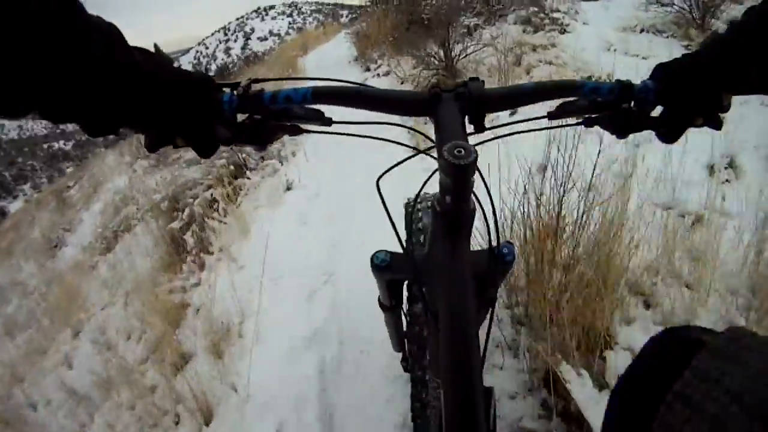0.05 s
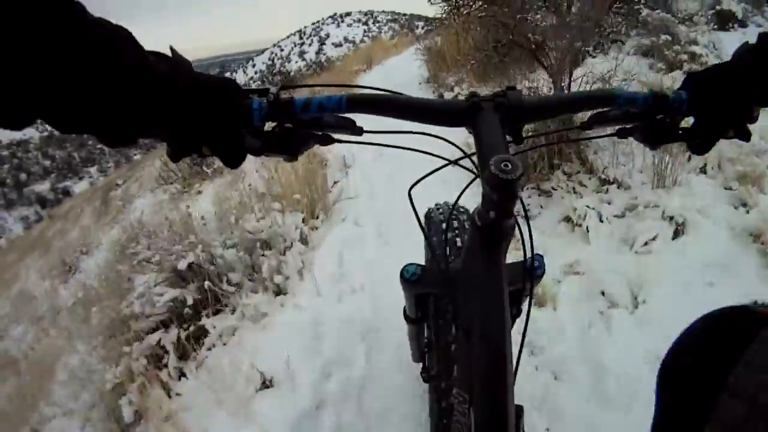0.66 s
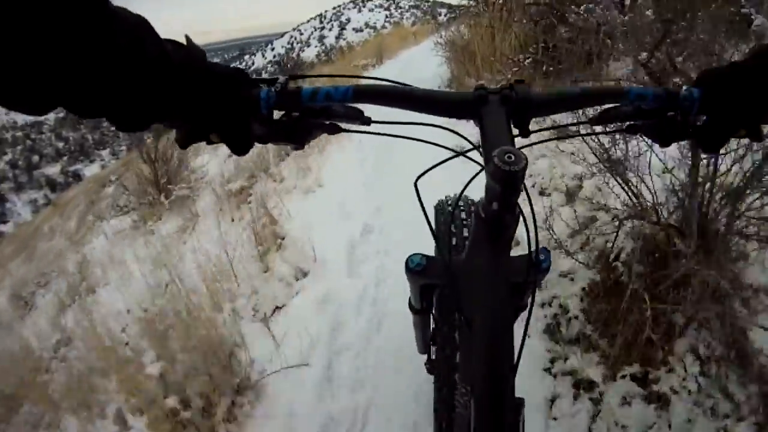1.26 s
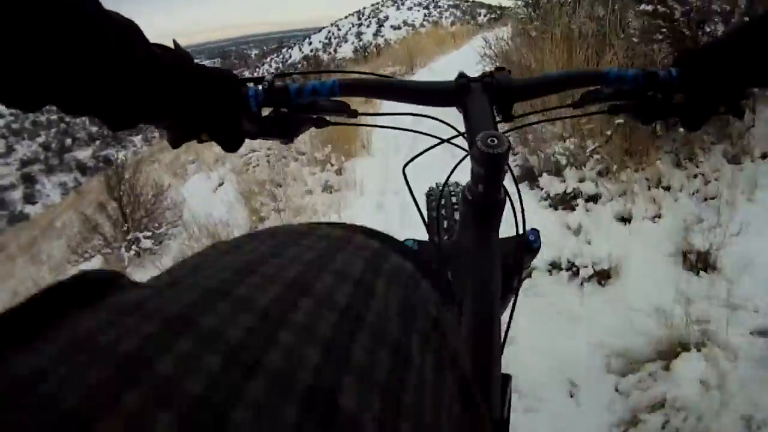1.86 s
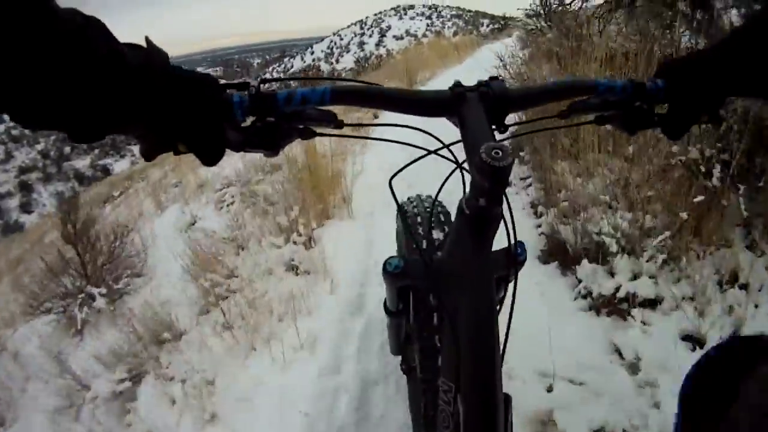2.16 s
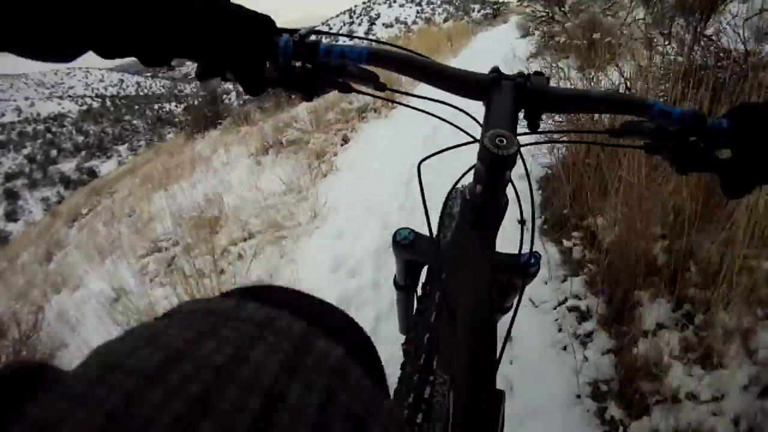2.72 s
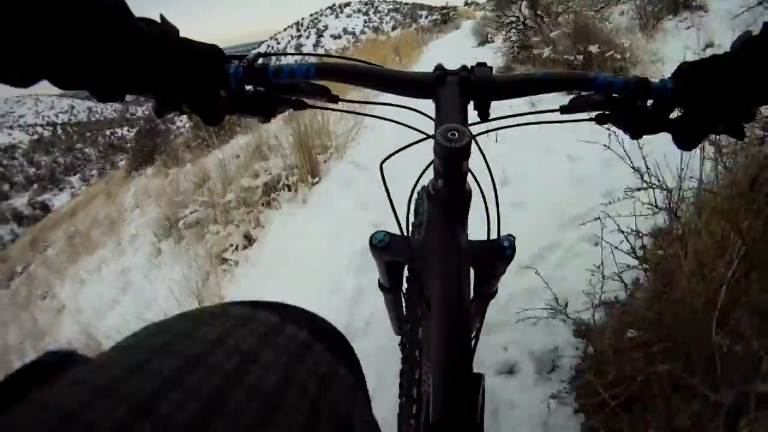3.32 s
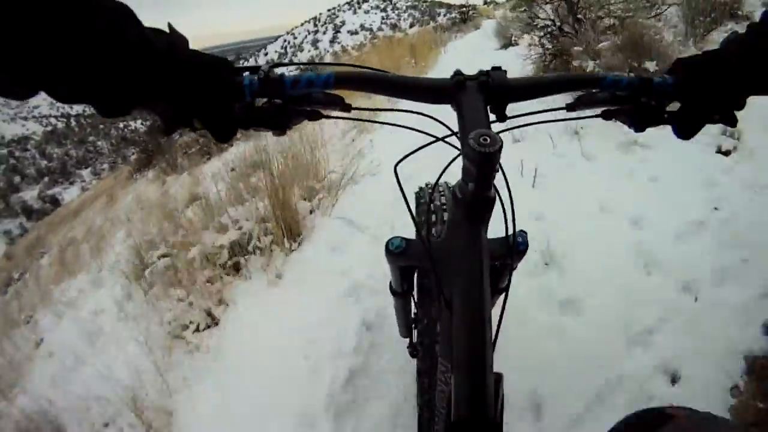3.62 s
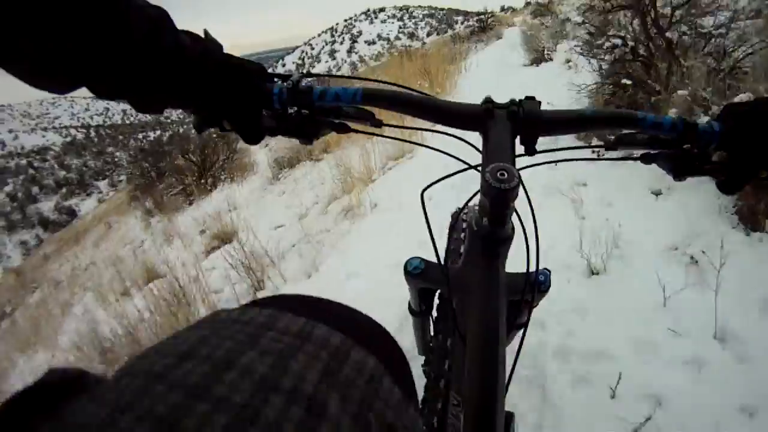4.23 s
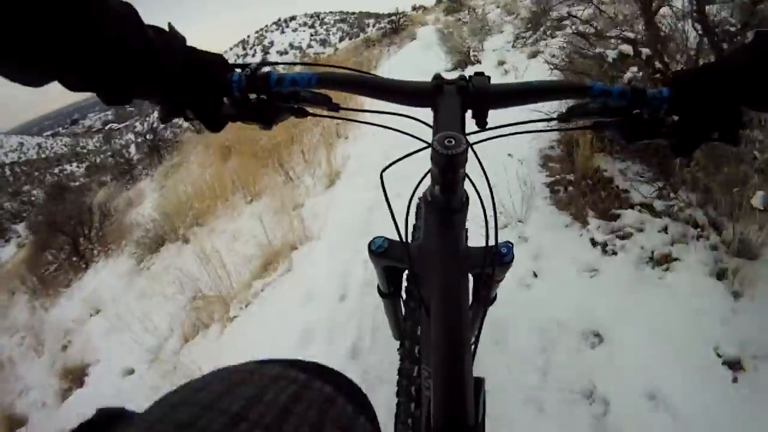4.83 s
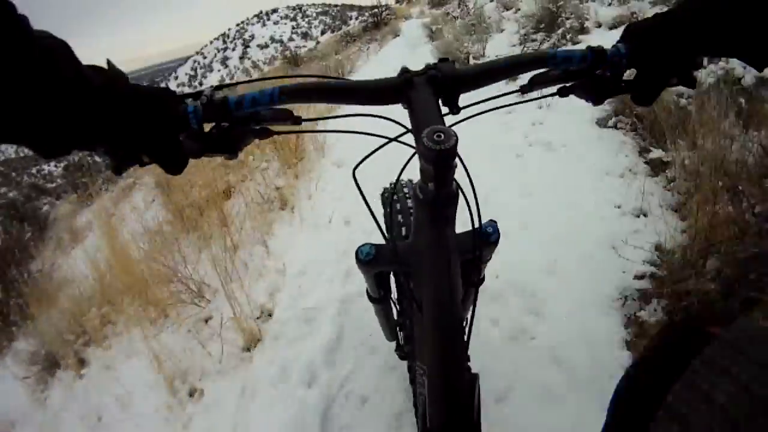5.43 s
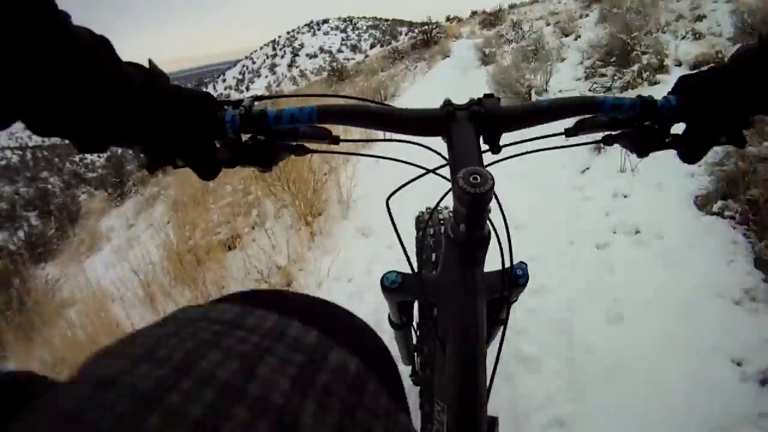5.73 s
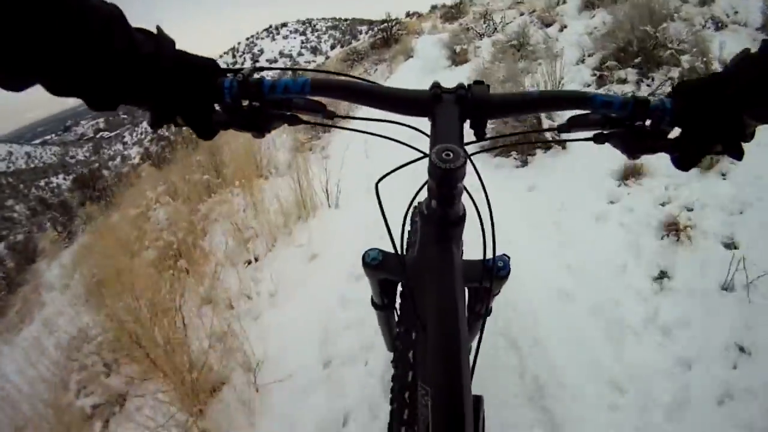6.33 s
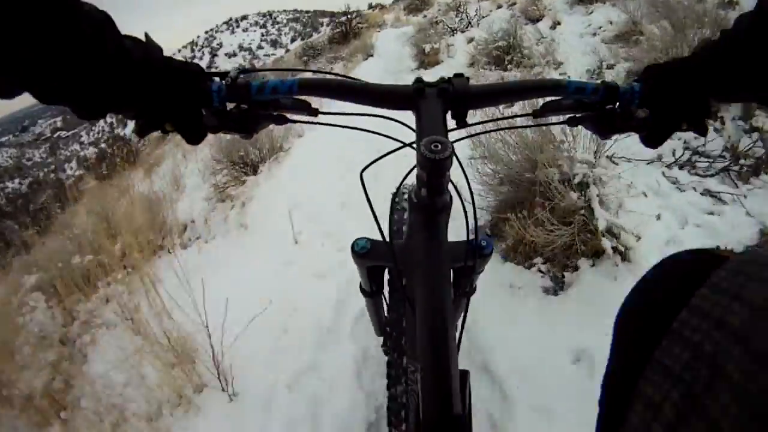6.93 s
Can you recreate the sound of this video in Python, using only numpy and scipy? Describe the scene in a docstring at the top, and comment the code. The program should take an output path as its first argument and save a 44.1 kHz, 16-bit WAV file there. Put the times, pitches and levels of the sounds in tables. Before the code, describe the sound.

A mountain bike rides along a snowy trail, its knobbly tyres making a steady low drone over a soft crunch of snow. Dull thumps shake the bike two or three times a second, often in quick pairs, and loose parts rattle faintly. The microphone on the rider's chest picks up deep air buffeting and body jolts. Everything sounds muffled and bass-heavy, with a slightly gritty, ringing edge.

```python
"""Tyres drone and crunch along a snowy trail, and a mountain bike knocks about twice to a pedal stroke.
The knocks are low thumps that shake the frame, and loose parts rattle along the way.
It is all heard from a closed camera on the rider's chest, jolted by the heaves of the rider's body.
The camera keeps only the bass and holds each value for a moment, which adds a gritty, ringing edge."""
import sys
import numpy as np
from scipy import signal
from scipy.fft import rfft, irfft, next_fast_len
from scipy.io import wavfile
from scipy.ndimage import map_coordinates

SR = 44100
rng = np.random.default_rng(int(sys.argv[2]) if len(sys.argv) > 2 else 0)


def transcribe(u):
    """Save the signal u as a 16-bit wav file named by the first command-line argument.

    u: samples, shape (n,) or (channels, n), limited to [-1, 1]; the rate is SR.
    q: integer samples, one column per channel.
    """
    v = np.clip(np.atleast_2d(u).T, -1, 1)
    q = np.round(v * 32767).astype(np.int16)
    wavfile.write(sys.argv[1], SR, q)


N = 316270
TIME = np.arange(N) / SR

# The bike's knocks, mostly a pair to each pedal stroke. Each row: start in seconds,
# relative thump level in dB, swell time in seconds, relative level of the frame's clack in dB.
BIKE_KNOCKS = [(0.5865, -30, 0.0088, -43.5), (0.9615, -28, 0.0041, -49.5), (1.031, -34, 0.0059, -51),
               (1.3561, -33, 0.0044, -45), (1.4196, -26, 0.0064, -56), (1.5083, -35, 0.0032, -50.5),
               (1.7098, -23.5, 0.0046, -41.5), (1.77, -29, .0043, -43.5), (2.082, -26.5, 0.0077, -42.5),
               (2.1421, -25, 0.0082, -47.5), (2.4578, -26.5, 0.0062, -43.5), (2.5107, -24.5, .008, -53),
               (2.9059, -30.5, 0.0089, -55), (3.2396, -31, 0.00444, -48.5), (3.5939, -31.5, 0.0056, -46.5),
               (4.1076, -29, 0.0077, -43), (4.4622, -32, 0.0062, -62), (4.4902, -30.5, 0.0066, -47.5),
               (4.8096, -25.5, 0.0039, -39), (4.8663, -26, 0.0063, -46.5), (5.1757, -32.5, 0.012, -52.5),
               (5.2178, -40, 0.002, -44), (5.64, -35, 0.0075, -60), (5.9189, -28, 0.0081, -49.5),
               (5.982, -26.5, 0.0075, -42.5), (6.732, -27, 0.0067, -50), (6.7707, -34, 0.0019, -44.5),
               (7.0923, -21, 0.0051, -39)]
# The tone of crunching snow, also used for rattles. Each row: frequency in Hz, relative level in dB.
CRUNCH_SPECTRUM = [(60, -3.5), (130, 0.5), (200, -3.5), (290, 0.5), (380, -2), (480, -2.5), (600, -3),
                   (740, -10), (1000, -39)]


def knocks(gain_db, thump_hz=76.7, hard_s=0.0051, stiffening=2.655, relax_s=0.0037):
    """Each knock is a dying thump whose pitch falls as the hard first contact relaxes."""
    track, t = np.zeros(N), TIME[:SR // 10]
    for start, db, swell_s, _ in BIKE_KNOCKS:
        hz = thump_hz * max(1, hard_s / swell_s) ** 0.32  # shorter contacts ring higher
        cycles = hz * (t + stiffening * relax_s * (1 - np.exp(-t / relax_s)))
        envelope = (t / swell_s * np.exp(1 - t / swell_s)) ** 1.64
        add(track, start, amp(db + gain_db) * envelope * np.sin(2 * np.pi * cycles))
    return track


def jolts(gain_db, swing_hz=24.1):
    """The camera is shoved and swings back; the pressure follows its acceleration."""
    # Heaves of the rider's body; the last row, at 7.16 s, is the push of a final knock. Each row: time of the
    # peak in seconds, relative level in dB.
    heaves = [(0.331, -26), (0.971, -36), (1.527, -32), (1.737, -26), (2.68, -29.5), (2.839, -28),
              (2.907, -32.5), (3.185, -30.5), (3.757, -37.5), (3.93, -27.5), (4.294, -29.5), (4.655, -32.5),
              (5.393, -31), (5.735, -31.5), (6.095, -27.5), (6.441, -29), (7.16, -28)]
    track = np.zeros(N)
    for peak_s, db in heaves:
        near = np.abs(TIME - peak_s) < 2 / swing_hz
        offset_squared = (np.pi * swing_hz * (TIME[near] - peak_s)) ** 2
        track[near] += amp(db + gain_db) * (1 - 2 * offset_squared) * np.exp(-offset_squared)
    return track


def rumble(level_db, sway_db, drone_db, throb_db):
    """The rider sways in the airflow while the knobbly tyres drone through the frame."""
    # The tones of the sway and of the drone. Each row: frequency in Hz, relative level in dB.
    sway_spectrum = [(2, -28), (7, 1), (14, 4.5), (25, -3.5), (40, -10), (55, -21.5), (90, -57), (200, -73)]
    drone_spectrum = [(25, -11), (50, -7.5), (64, -5.5), (80, -2.5), (100, -3.5), (125, -13.5),
                      (160, -19.5), (220, -24), (500, -87)]
    sway = amp(sway_db) * noise(sway_spectrum)
    drone = amp(drone_db) * unit(noise(drone_spectrum) * amp(throb_db * wobble(28)))
    return amp(level_db) * (sway + drone)


def frame_clacks(gain_db, ring_hz=309.7, lag_s=0.00042):
    """Every knock shakes the frame, which rings and scrapes an instant later."""
    # The tone of the frame's scrape. Each row: frequency in Hz, relative level in dB.
    grit_spectrum = [(60, -4), (140, 1.5), (220, 3.5), (320, -2), (450, -3), (600, -4.5), (740, -9.5),
                     (1000, -40)]
    shakes = [(start + lag_s, db + gain_db, ring_hz) for start, _, _, db in BIKE_KNOCKS]
    return clacks(shakes, grit_spectrum, ring_s=0.13, scrape_db=10.0, scrape_s=0.058, attack_s=0.00039)


def crunch(level_db, rustle_db, grain_db, grains_per_s, clump_db):
    """Snow packs under the tread: a fine rustle with clumps of small collapses."""
    collapses = (rng.random(N) < grains_per_s / SR) * rng.standard_normal(N)
    rustle = amp(rustle_db) * noise(CRUNCH_SPECTRUM)
    grains = amp(grain_db) * coloured(collapses, CRUNCH_SPECTRUM)
    clumps = unit(amp(clump_db * wobble(45)))
    return amp(level_db) * clumps * (rustle + grains)


def rattles(crunch_db, gain_db):
    """Loose parts tap and ring briefly: some clear taps, with faint chatter in between."""
    # The clearest taps. Each row: start in seconds, relative level in dB, pitch in Hz.
    clear_taps = [(0.2763, -48, 433), (0.3236, -46, 472), (0.3769, -44.5, 274), (0.5589, -45.5, 283),
                  (1.1476, -49, 260), (1.4603, -45.5, 590), (1.4796, -50.5, 433), (1.6169, -44.5, 288),
                  (2.4889, -38.5, 652), (2.8396, -45, 232), (3.2382, -36.5, 206), (3.2989, -45, 445),
                  (3.7696, -43, 255), (3.8456, -51, 530), (4.0849, -48.5, 504), (5.0216, -48.5, 580),
                  (5.8216, -48.5, 396), (6.3083, -47, 242), (6.4043, -43, 536), (7.0389, -42.5, 313)]
    taps = [(start, db + gain_db, hz) for start, db, hz in clear_taps + chatter(crunch_db)]
    return clacks(taps, CRUNCH_SPECTRUM, ring_s=0.022, scrape_db=-1.5, scrape_s=0.053, attack_s=0.000075)


def chatter(crunch_db, count=14, boost_db=6, low_hz=250, high_hz=597):
    """List faint taps scattered along the ride, stronger where the snow is rougher."""
    when, pitch = rng.random((count, 2)).T
    starts = (np.arange(count) + when) / count * TIME[-1]
    db = np.interp(starts, TIME, crunch_db) + boost_db + rng.standard_normal(count)
    return list(zip(starts, db, low_hz + pitch * (high_hz - low_hz)))


def clacks(contacts, spectrum, ring_s, scrape_db, scrape_s, attack_s):
    """Each contact makes a part ring and scrape; these fade by 60 dB in ring_s and scrape_s."""
    track, t = np.zeros(N), TIME[:SR // 10]
    grit = noise(spectrum)
    rise = 1 - np.exp(-t / attack_s)
    for start, db, hz in contacts:
        ring = rise * amp(-60 * t / ring_s) * np.sin(2 * np.pi * hz * t)
        scrape = rise * amp(-60 * t / scrape_s) * np.roll(grit, -round(start * SR))[:len(t)]
        add(track, start, amp(db) * unit(unit(ring) + amp(scrape_db) * unit(scrape)))
    return track


def trail_levels():
    """Rumble and crunch levels in dB: they follow the trail and surge around each knock."""
    # How rough the trail is. Each row: time in seconds, base rumble level in dB, base crunch level in dB.
    roughness = [(0.0, -41.5, -60.5), (0.38, -47, -61), (0.8, -48.5, -62.5), (1.2, -50, -60),
                 (1.6, -44, -60), (1.98, -48, -61), (2.28, -51.5, -63), (2.75, -46.5, -62.5),
                 (3.05, -44.5, -62), (3.35, -49.5, -60), (3.85, -47.5, -60.5), (4.3, -51, -63.5),
                 (4.75, -49, -63.5), (5.35, -45.5, -60.5), (5.65, -50, -60.5), (6.28, -47, -63.5),
                 (6.48, -47, -60.5), (7.17, -47.5, -64.5)]
    times, rumble_db, crunch_db = np.transpose(roughness)
    # The tread bites just before a knock, and the rumble peaks just after.
    rumble_db = np.interp(TIME, times, rumble_db) + 3.0 * surge(delay_s=0.018) + 1.5 * wobble(10)
    crunch_db = np.interp(TIME, times, crunch_db) + 1.5 * surge(delay_s=-0.076)
    return rumble_db, crunch_db


def surge(delay_s, half_length_s=0.04):
    """The push around each knock: a swell that peaks delay_s after it and averages zero."""
    peaks = np.array([row[0] for row in BIKE_KNOCKS]) + delay_s
    midpoints = (peaks[1:] + peaks[:-1]) / 2
    nearest = peaks[np.searchsorted(midpoints, TIME)]
    push = np.exp(-((TIME - nearest) / half_length_s) ** 2)
    return push - push.mean()


def amp(db):
    """Turn decibels into a number to multiply by."""
    return 10 ** (np.asarray(db) / 20)


def unit(x):
    """Scale a sound to an average strength (rms) of 1."""
    return x / np.sqrt(np.mean(x ** 2) + 1e-20)


def filtered(x, response):
    """Multiply each frequency in a sound by response(hz)."""
    size = next_fast_len(len(x) + SR // 2)
    return irfft(rfft(x, size) * response(np.fft.rfftfreq(size, 1 / SR)), size)[:len(x)]


def coloured(x, spectrum):
    """Give a sound the tone in a spectrum table, at strength 1."""
    hz, db = np.transpose(spectrum)
    return unit(filtered(x, lambda f: amp(np.interp(np.log(f + 1), np.log(hz + 1), db))))


def noise(spectrum):
    """Fresh noise with the given tone, at strength 1."""
    return coloured(rng.standard_normal(N), spectrum)


def wobble(rate):
    """A smooth curve through `rate` random points a second."""
    return map_coordinates(rng.standard_normal(int(N * rate / SR) + 4), [TIME * rate])


def add(track, start, sound):
    """Mix a sound into the track, with its start in seconds."""
    part = track[max(round(start * SR), 0):][:len(sound)]
    part += sound[:len(part)]


def scene():
    """Rolling noise, bumps and rattles add up at one microphone."""
    rumble_db, crunch_db = trail_levels()
    bumps = knocks(gain_db=0.5) + jolts(gain_db=2.5)
    rolling = rumble(rumble_db, sway_db=7.5, drone_db=-1.5, throb_db=3.0)
    snow = crunch(crunch_db, rustle_db=1.3, grain_db=-5.5, grains_per_s=90, clump_db=1.85)
    frame = frame_clacks(gain_db=-8.5)
    loose_parts = rattles(crunch_db, gain_db=-12.0)
    return (bumps + rolling + snow + frame + loose_parts)[None]


def record(dry):
    """The camera holds the bass in steps, which mirror it around each multiple of the hold rate."""
    bass_hz, hold_hz, soften_hz, top_hz = 715, 1500, 15300, 16500
    bass = filtered(dry[0], lambda hz: 1 / np.sqrt(1 + (hz / bass_hz) ** 70))
    fine_time = np.arange(5 * N) / (5 * SR)  # a finer clock keeps the steps even
    step_middles = (np.floor(fine_time * hold_hz) + 0.5) / hold_hz
    steps = np.interp(step_middles, TIME, bass)
    held = signal.resample_poly(steps, 1, 5)
    # The highest treble fades, then cuts off.
    return filtered(held, lambda hz: amp(np.interp(hz, [soften_hz, 15800], [0, -9])) * (hz < top_hz))[None]


dry = scene()
out = record(dry)
transcribe(out)
```